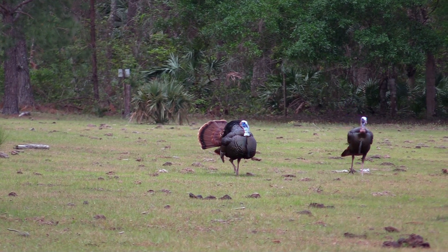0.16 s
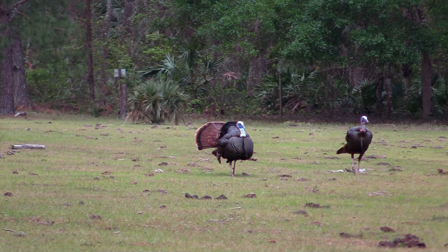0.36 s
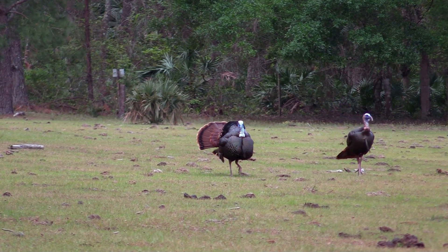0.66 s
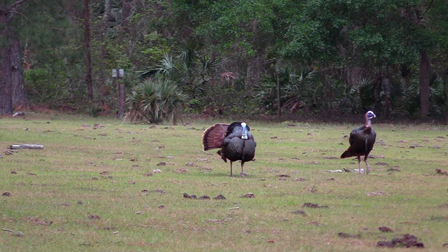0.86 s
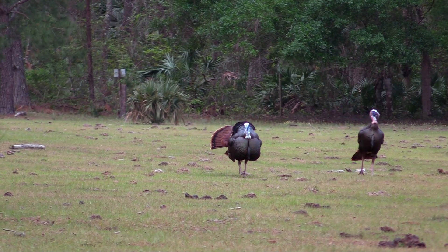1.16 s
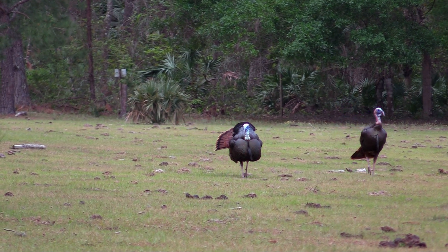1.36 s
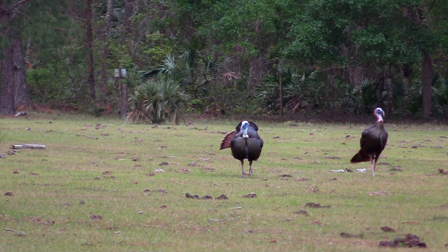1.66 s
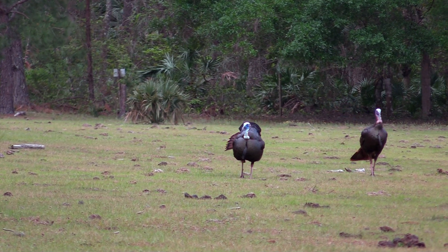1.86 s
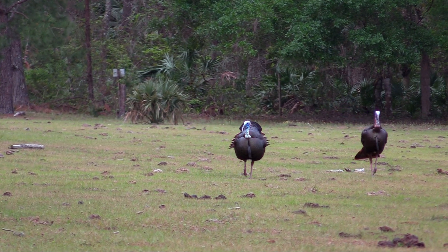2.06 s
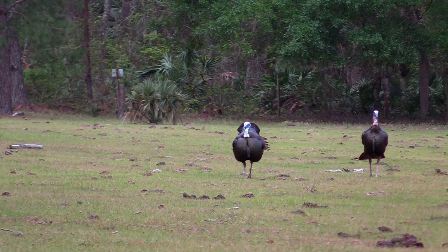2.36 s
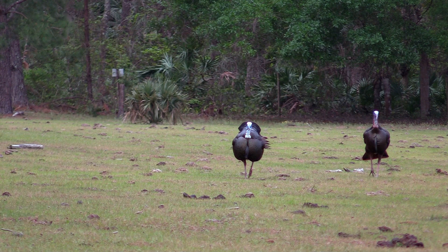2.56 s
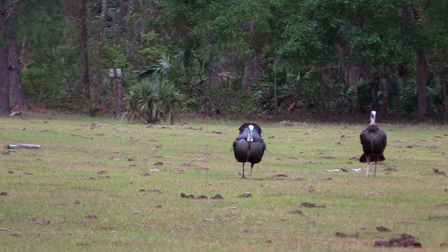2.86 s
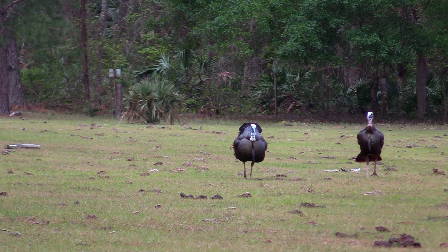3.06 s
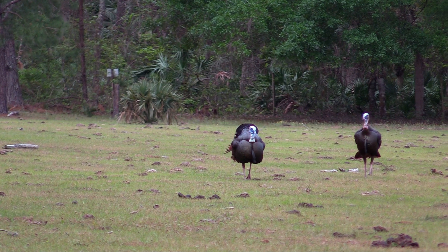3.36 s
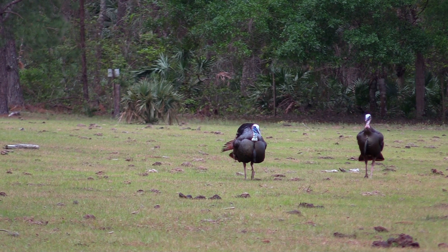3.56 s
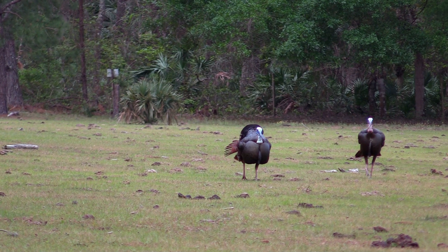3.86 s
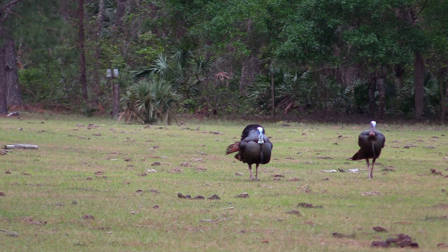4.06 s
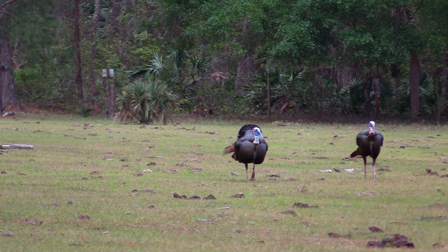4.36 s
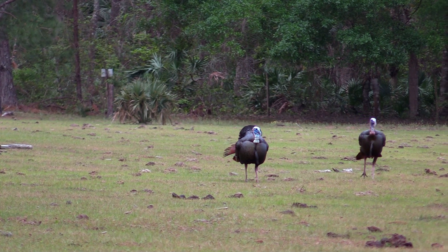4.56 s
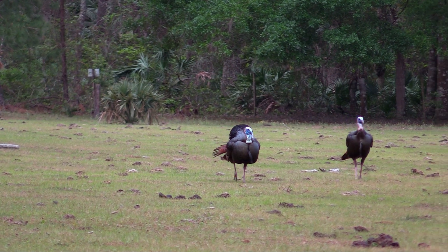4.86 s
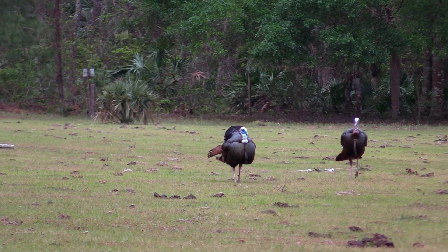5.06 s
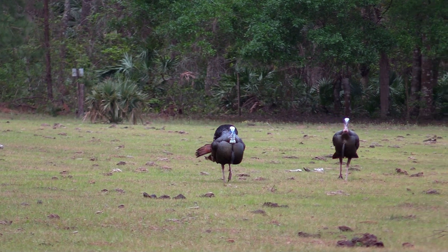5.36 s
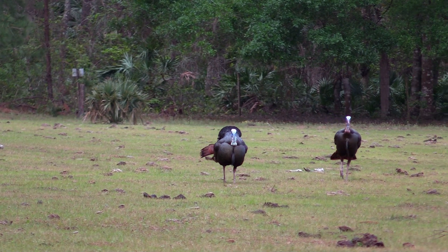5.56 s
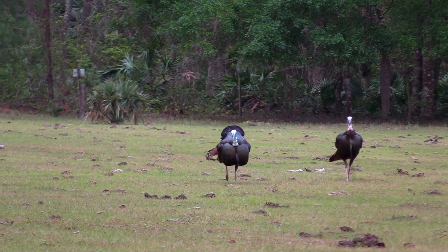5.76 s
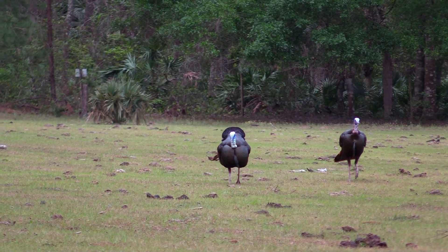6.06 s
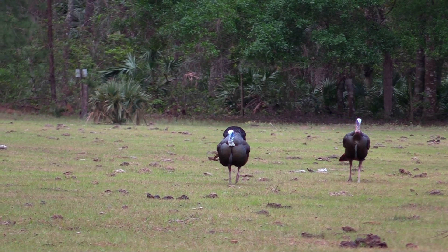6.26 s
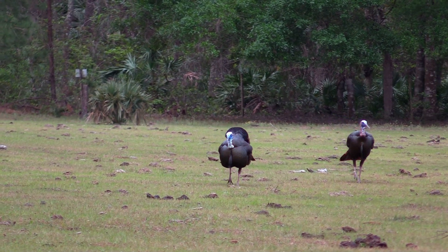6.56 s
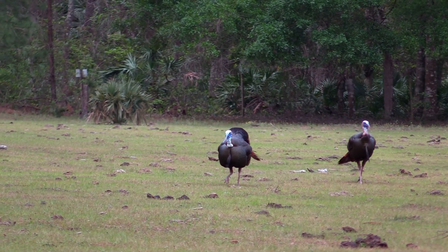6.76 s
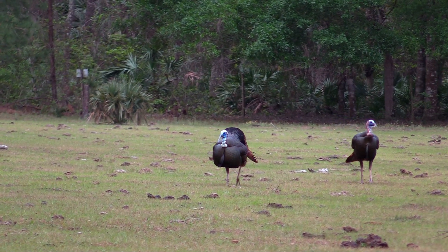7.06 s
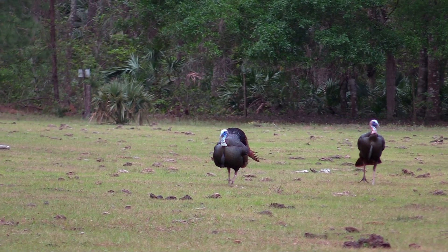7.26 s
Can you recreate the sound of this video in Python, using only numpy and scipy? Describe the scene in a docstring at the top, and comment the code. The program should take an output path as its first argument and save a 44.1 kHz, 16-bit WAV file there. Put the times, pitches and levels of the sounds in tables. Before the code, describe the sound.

A wild turkey lets out one loud, rapid seven-note gobble across an open field, with soft air, low rumble and faint distant birds.

```python
"""A wild turkey gobbles once in a field at the edge of a wood: seven short, loud yelps.
Each is a sum of harmonics that sags, flicks up again and is broken up by resonant slaps.
Behind it are close ticks, faint far calls from the wood, insects and hums made of narrow noise bands,
and rustling air and a low distant rumble made of filtered noise, heard on two microphones.
The recorder's gain control ducks under the gobble and slowly lets the background swell back."""
import sys
import numpy as np
from scipy import signal
from scipy.fft import rfft, irfft, next_fast_len
from scipy.io import wavfile
from scipy.ndimage import uniform_filter1d, minimum_filter1d

SR = 44100
rng = np.random.default_rng(int(sys.argv[2]) if len(sys.argv) > 2 else 0)


def int16_out(signal):
    """Quantize to a 16-bit WAV file."""
    q = np.round(np.clip(np.atleast_2d(signal).T, -1, 1) * 32767)
    wavfile.write(sys.argv[1], SR, q.astype(np.int16))


N = 326781
TIME = np.arange(N) / SR
FREQS = np.maximum(np.arange(N // 2 + 1) * SR / N, 1)


def from_db(db):
    """Decibels to amplitude gain."""
    return 10 ** (np.asarray(db) / 20)


def rms_one(x):
    """Scale to unit rms."""
    return x / np.sqrt(np.mean(x ** 2) + 1e-20)


def at_hz(points, hz, axis=1):
    """Read one column of a spectrum, interpolated on a log-frequency axis."""
    points = np.array(points)
    return np.interp(np.log(hz), np.log(points[:, 0]), points[:, axis])


def colour(x, gain):
    """Filter by a gain per frequency."""
    return irfft(rfft(x) * gain, N)


def ring(x, spectrum):
    """Causal (minimum-phase) body with this spectrum: it rings only after it is struck."""
    size = 2048
    hz = np.maximum(np.arange(size // 2 + 1) * SR / size, 1)
    log_gain = np.log(from_db(at_hz(spectrum, hz)))
    # doubling the cepstrum's positive times makes the response causal
    cepstrum = irfft(log_gain)[:size // 2]
    cepstrum[1:] *= 2
    response = irfft(np.exp(rfft(cepstrum, size)))
    return signal.fftconvolve(x, response)[:len(x)]


def above(x, edge_hz):
    """High-pass with a moving edge: fade between fixed filters a step apart."""
    step = 100  # Hz
    edges = step * np.arange(3, 13)
    edge_hz = np.clip(edge_hz, edges[0], edges[-1])
    shares = np.maximum(1 - np.abs(edge_hz - edges[:, None]) / step, 0)
    filters = [signal.butter(5, hz, "high", fs=SR, output="sos") for hz in edges]
    passed = [signal.sosfiltfilt(sos, x) for sos in filters]
    return np.sum(shares * passed, axis=0)


def drift(rate_hz, size):
    """Smooth chance with spread 1, cut from at least a second of low-passed noise."""
    length = next_fast_len(max(size, int(SR)))
    hz = np.arange(length // 2 + 1) * SR / length
    spectrum = rfft(rng.standard_normal(length)) / (1 + (hz / rate_hz) ** 4)
    return rms_one(irfft(spectrum, length))[:size]


def evened(x):
    """Hold the level steady over a few slaps."""
    power = uniform_filter1d(x ** 2, size=440)
    return x / np.sqrt(power + 1e-3 * np.mean(x ** 2))


# How alike the field sounds at the two microphones. Each row: frequency in Hz, likeness from 0 to 1.
MICROPHONE_LIKENESS = [(60, 0.87), (180, 1), (550, 0.37), (1650, 0.076), (4970, 0.37), (15000, 0.81)]


def likeness(hz):
    """Similarity of the two channels at a frequency: a wave may reach both microphones much alike."""
    return np.clip(at_hz(MICROPHONE_LIKENESS, hz), 0, .99)


def stereo_noise(spectrum):
    """Noise of this spectrum, partly alike in the two channels; rms 1."""
    alike = likeness(FREQS)
    shape = from_db(at_hz(spectrum, FREQS))
    mid = colour(rng.standard_normal(N), shape * np.sqrt(1 + alike))
    side = colour(rng.standard_normal(N), shape * np.sqrt(1 - alike))
    return rms_one(np.array([mid + side, mid - side]))


def narrow_noise(turn, width_hz, size):
    """Random slow swings of a cosine and a sine smear a tone into a narrow band."""
    in_phase = drift(width_hz / 2, size) * np.cos(turn)
    return in_phase + drift(width_hz / 2, size) * np.sin(turn)


def blurred_tone(hz, width_hz, size):
    """A tone (steady or gliding) smeared into a narrow band, partly alike in the two channels; rms 1."""
    turn = 2 * np.pi * np.cumsum(hz * np.ones(size)) / SR
    mid = narrow_noise(turn, width_hz, size)
    side = narrow_noise(turn, width_hz, size)
    alike = likeness(np.mean(hz))
    return rms_one(np.sqrt(1 + alike) * mid + np.sqrt(1 - alike) * side * [[1], [-1]])


SAG_S, FLICK_CURVE = .013, 2.5  # the pitch drops quickly, and rises ever faster at the end
HOLD_SHARE, FADE_CURVE = 0.47, 2.75  # the level holds up to this share of a yelp, then falls ever faster
FLANK_RASP, CLEARING_CURVE = 0.77, 4.9  # rough while it swells and fades, clear at the very end
BREAK_S = 0.0073  # a clean tone breaks up this fast
OPENING_RASP, OPENING_S = 0.48, 0.0077  # every yelp opens with a scrape that dies away


def gesture(t, length, first_hz, lowest_hz, last_hz, flick_s, peak_db,
            swell_s, swell_db, fade_db, rasp, clean_s):
    """Pitch, level and rasp of a yelp: it swells as the pitch sags and fades as the pitch flicks up."""
    flick = np.clip(1 - (length - t) / flick_s, 0, 1) ** FLICK_CURVE
    sag = np.exp(-t / SAG_S)
    pitch = lowest_hz + (first_hz - lowest_hz) * sag + (last_hz - lowest_hz) * flick

    unopened = .5 + .5 * np.cos(np.pi * np.minimum(t / swell_s, 1))
    closing = np.clip((t / length - HOLD_SHARE) / (1 - HOLD_SHARE), 0, 1)
    level_db = peak_db - swell_db * unopened - fade_db * closing ** FADE_CURVE

    rough = rasp + (FLANK_RASP - rasp) * np.maximum(unopened, closing)
    rough = rough * (1 - closing ** CLEARING_CURVE)
    broken = np.clip(1 + (t - clean_s) / BREAK_S, 0, 1)
    scrape = OPENING_RASP * np.exp(-t / OPENING_S)
    return pitch, level_db, np.clip(np.maximum(rough * broken, scrape), .03, .97)


# What the throat passes of the tone's harmonics. Each row: frequency in Hz, relative level in dB.
THROAT_RESPONSE = [(550, 1), (680, -8), (900, -11.5), (1230, 3.5), (1450, -4), (1720, -4.5), (1930, -11),
                   (2200, -17.5), (2600, -23.5), (3100, -32), (4200, -41)]
DULLING_DB = 5.5  # by a yelp's end each harmonic has lost this much more than the one below it


def throat_tone(t, length, pitch, cycles):
    """The syrinx's first six harmonics, weighted by the throat and duller as the yelp closes."""
    dulling_db = DULLING_DB * np.minimum(t / length, 1) ** CLEARING_CURVE
    tone = 0
    for k in range(1, 7):
        harmonic_db = at_hz(THROAT_RESPONSE, k * pitch) - dulling_db * (k - 5)
        tone = tone + from_db(harmonic_db) * np.sin(2 * np.pi * k * cycles)
    return evened(tone)


# The ring of one slap of the syrinx. Each row: frequency in Hz, relative level in dB.
SLAP_RING = [(250, -24.5), (450, -5.5), (750, -1), (1250, 6.5), (1600, -3.5), (1950, 8), (2180, -2.5),
             (2400, -11), (3050, -28.5), (3350, -20), (3800, -37), (4650, -24.5), (5100, -24), (9000, -71)]


def syrinx_slaps(cycles, pitch, slap_cycles, rattle_db=-28, slap_db=1.5, below_pitch_hz=115):
    """Equal impulses as the syrinx slaps shut, with a fine rattle between them, ring the body."""
    size = len(cycles)
    at = np.searchsorted(cycles, slap_cycles)
    clicks = from_db(rattle_db) * rng.standard_normal(size)
    clicks[at[at < size]] -= 1
    # a tighter syrinx rings higher: little sounds far below the pitch
    ringing = above(ring(clicks, SLAP_RING), pitch - below_pitch_hz)
    return from_db(slap_db) * evened(ringing)


# High resonances that rasp and effort wake. Each row: frequency in Hz, nominal width in Hz,
# level in dB before the rasp and effort scale it.
EDGE_RESONANCES = [(2610, 460, -18.5), (3343, 340, -21.5), (5160, 560, -20.5)]


def bright_edge(level_db, rasp, brightening=0.34, full_effort_db=14):
    """Narrow noise bands that strengthen in loud, rough stretches."""
    edge = 0
    for hz, width_hz, db in EDGE_RESONANCES:
        edge = edge + from_db(db) * blurred_tone(hz, width_hz, len(rasp))[0]
    return edge * np.sqrt(rasp) * from_db(brightening * (level_db - full_effort_db))


def yelp(start, length, shape, jitter=0.034, cycles_per_slap=3.8, slap_scatter=.17,
         pulsing=0.49, throb=0.38, throb_hz=190, fade_s=0.0011):
    """The syrinx sings a sagging tone and slaps shut about every four cycles: indices, sound, rasp."""
    size = int((length + .02) * SR)
    t = np.arange(size) / SR
    pitch, level_db, rasp = gesture(t, length, *shape)
    shaken_hz = pitch * (1 + jitter * np.sqrt(rasp) * drift(300, size))
    cycles = np.cumsum(shaken_hz) / SR
    tone = throat_tone(t, length, pitch, cycles)

    # slaps come at uneven gaps
    gaps = cycles_per_slap * np.exp(slap_scatter * rng.standard_normal(80))
    slap_cycles = np.cumsum(gaps) - gaps[0] + .5
    slaps = syrinx_slaps(cycles, pitch, slap_cycles)

    # rough tone swells with each slap and throbs by chance: side bands between its harmonics
    swell = np.cos(2 * np.pi * np.interp(cycles, slap_cycles, np.arange(len(gaps))))
    tone = tone * (1 + rasp * (pulsing * swell + throb * drift(throb_hz, size)))
    voice = evened(np.sqrt(1 - rasp ** 2) * tone + rasp * slaps)
    voice = voice + bright_edge(level_db, rasp)
    gate = np.minimum(t / 0.00078, 1) * np.exp(-np.maximum(t - length, 0) / fade_s)
    return int(start * SR) + np.arange(size), voice * from_db(level_db) * gate, rasp


# The yelps, before the recorder's gain control. Each row: start in seconds, length in seconds,
# first, lowest and last pitch in Hz, closing flick in seconds, peak level in dB, swell in seconds,
# swell in dB, fade in dB, rasp from 0 to 1 in mid-yelp, time until the tone has broken up in seconds.
YELP_GESTURES = [(1.258, 0.1, 695, 642, 803, 0.0422, -9, .02, 2, 11.5, 0.25, 0.038),
                 (1.566, 0.11, 762, 588.7, 855, 0.036, 3.3, 0.085, 12.5, 17.5, 0.27, 0.0052),
                 (1.8717, 0.12, 948.5, 620, 982, 0.071, 3, 0.058, 10, 32.5, 0.35, 0),
                 (2.1948, 0.12, 858, 621.7, 1157, 0.0333, 7, 0.046, 18.5, 31, 0.25, 0.00092),
                 (2.512, 0.1, 991, 676, 1085, .064, -2, 0.036, 5.5, 20, 0.47, 0.016),
                 (2.8187, 0.096, 949, 716.6, 1188, 0.044, -5, .03, 2, 5, 0.67, 0),
                 (3.128, 0.076, 1044, 880.4, 1070, 0.04, -7.5, 0.008, 10, 3.5, 0.87, 0.0021)]
# Weak echoes from the ground and the trees. Each row: delay in seconds, level in dB.
FIELD_ECHOES = [(.014, -21.5), (.045, -37), (.11, -48)]
# The bird at the two microphones. Each row: frequency in Hz, left over right in dB,
# phase lead of the left in radians.
BIRD_AT_MICROPHONES = [(198, -5, -1.5), (613, 0, 1.72), (800, 5, 1.1), (1100, 6.5, 1.46), (1320, 16.5, 0.6),
                       (1610, 11.5, 0), (2020, 11, 0.5), (2730, 8, 1.14), (3400, 8.5, 1.44),
                       (5140, 4.5, 3.5)]
# Hiss that rides on the yelps. Each row: frequency in Hz, relative level in dB.
YELP_HISS = [(2500, -4), (5500, -1.5), (6800, 5.5), (8200, 1), (10400, 3.5), (11200, -12.5), (14000, -13),
             (15000, -28)]


def turkey(hiss_db=-30.5):
    """Yelps with weak echoes and hiss on their rough peaks; the voice mostly leads on the left."""
    voice, hiss_level = np.zeros((2, N))
    for start, length, *shape in YELP_GESTURES:
        span, sound, rasp = yelp(start, length, shape)
        voice[span] += sound
        hiss_level[span] += from_db(hiss_db) * np.abs(sound) * np.sqrt(rasp)

    left = voice.copy()
    for delay, db in FIELD_ECHOES:
        left += from_db(db) * np.interp(TIME - delay, TIME, voice)
    right_gain = from_db(-at_hz(BIRD_AT_MICROPHONES, FREQS))
    right_lag = np.exp(-1j * at_hz(BIRD_AT_MICROPHONES, FREQS, axis=2))
    right = colour(left, right_gain * right_lag)
    return np.array([left, right]) + hiss_level * stereo_noise(YELP_HISS)


# Small dry ticks close by. Each row: start in seconds, peak level in dB, lowest Hz, highest Hz.
CLOSE_TICKS = [(1.0305, -17, 700, 1590), (6.8577, -29, 5500, 8000), (6.91, -32, 7500, 10500),
               (6.9302, -37, 9000, 13000)]


def ticks():
    """Each tick is a single impulse filtered into its own band, equal at both microphones."""
    out = np.zeros(N)
    for s, db, low_hz, high_hz in CLOSE_TICKS:
        band = signal.butter(1, np.sort([low_hz, high_hz]), "band", fs=SR, output="sos")
        snap = signal.sosfilt(band, signal.unit_impulse(256))
        first = int(s * SR)
        out[first:first + len(snap)] += from_db(db) * snap / snap.max()
    return out


def far_call(start, length, db, hz, width_hz, fall_hz=0):
    """A distant call: a blurred tone that rises quickly, may glide down, and dies away."""
    out, first = np.zeros((2, N)), int(start * SR)
    size = min(int(length * SR), N - first)
    progress = np.linspace(0, 1, size)
    envelope = from_db(db) * np.sin(np.pi * np.sqrt(progress))
    out[:, first:first + size] = envelope * blurred_tone(hz - fall_hz * progress, width_hz, size)
    return out


# Far calls from the wood, with levels before the envelope and the lean to the right.
# A far bird's falling whistle. Each row: start in seconds, length in seconds, level in dB.
FALLING_WHISTLES = [(0.816, .35, -50), (1.284, .28, -50), (5.784, .26, -54), (6.226, 0.42, -50),
                    (6.686, 0.33, -48)]
# A lower, level reply. Each row: start in seconds, length in seconds, level in dB.
LEVEL_REPLIES = [(1.05, 0.21, -50), (6.02, 0.15, -52), (6.45, .27, -48)]
# Thin high chirps. Each row: start in seconds, length in seconds, starting pitch in Hz, level in dB.
HIGH_CHIRPS = [(5.45, 0.05, 6950, -50.5), (5.688, 0.047, 7070, -52.5), (5.89, 0.34, 7200, -53.5),
               (6.124, 0.28, 7400, -55.5)]
# Far hoots on one note. Each row: start in seconds, length in seconds, level in dB.
FAR_HOOTS = [(3.847, 1, -49), (4.582, 0.43, -48.5), (5.783, 0.26, -44), (6.007, 0.2, -43),
             (6.152, 0.44, -45), (6.589, .17, -50)]
CHIRP_FALL_HZ_PER_S, CHIRP_SPREAD_HZ_PER_S = 900, 1900  # a longer chirp falls further and is wider


def far_calls(right_db=3.5):
    """Four kinds of blurred call from the wood, a little to the right."""
    whistles = sum(far_call(*row, hz=3416, width_hz=116, fall_hz=170.3) for row in FALLING_WHISTLES)
    replies = sum(far_call(*row, hz=2570, width_hz=110) for row in LEVEL_REPLIES)
    hoots = sum(far_call(*row, hz=761, width_hz=12) for row in FAR_HOOTS)
    chirps = np.zeros((2, N))
    for s, length, hz, db in HIGH_CHIRPS:
        width_hz, fall_hz = CHIRP_SPREAD_HZ_PER_S * length, CHIRP_FALL_HZ_PER_S * length
        chirps += far_call(s, length, db, hz, width_hz, fall_hz)
    return (whistles + replies + chirps + hoots) * from_db([[-right_db], [0]])


# Steady far sounds: a low hum, a faint whine and two bands of insects.
# Each row: frequency in Hz, nominal width in Hz, mean level in dB.
FAR_DRONES = [(109.5, 18, -48.5), (199.2, 14.3, -49.5), (764, 30, -51), (5040, 440, -60.5),
              (5760, 1170, -57)]


def drones(lumpy_db):
    """Hum, whine and insects as narrow noise bands whose levels wander slightly."""
    out = np.zeros((2, N))
    for hz, width_hz, db in FAR_DRONES:
        out += from_db(db + lumpy_db * drift(6, N)) * blurred_tone(hz, width_hz, N)
    return out


# A low hum that comes up near the end. Each row: time in seconds, level in dB.
HUM_LEVEL = [(6.25, -59), (6.5, -39.5), (6.95, -42), (7.41, -52)]


def late_hum():
    """A narrow low band follows a level drawn over time."""
    level_db = np.interp(TIME, *np.transpose(HUM_LEVEL))
    return from_db(level_db) * blurred_tone(110.8, 5.4, N)


# Rustling air over the field. Each row: frequency in Hz, relative level in dB per Hz.
AIR_SPECTRUM = [(60, -34), (250, -2), (600, 1), (1050, -0.5), (1300, -2), (2300, -7), (3000, -11.5),
                (4300, -17), (6500, -19.5), (10000, -25), (13000, -30), (15500, -40)]


def rustling_air(air_db=-39.0):
    """Steady broad noise, partly alike at the microphones."""
    return from_db(air_db) * stereo_noise(AIR_SPECTRUM)


# Distant rumble. Each row: frequency in Hz, relative level in dB per Hz.
RUMBLE_SPECTRUM = [(20, -22), (35, -19), (50, -6.5), (80, 0.5), (115, -0.5), (145, 1.5), (172, -7.5),
                   (198, -3), (250, -12), (400, -18), (900, -49)]
GUST_S, GUST_LENGTH_S, GUST_DB = 4.83, 0.061, 9  # centre, spread and lift of one soft gust


def distant_rumble(lumpy_db, rumble_db=-37.5):
    """Low noise wanders slightly in level and is lifted once by a gust."""
    gust = np.exp(-((TIME - GUST_S) / GUST_LENGTH_S) ** 2)
    level_db = rumble_db + GUST_DB * gust + lumpy_db * drift(8.1, N)
    return from_db(level_db) * stereo_noise(RUMBLE_SPECTRUM)


# the background dips briefly, deepest just after the last yelp
DIP_S, DIP_FALL_S, DIP_RECOVERY_S, DIP_DB = 3.29, 0.11, 0.32, 8


def scene(lumpy_db=0.4):
    """The turkey over the field's background."""
    background = ticks() + far_calls() + drones(lumpy_db) + late_hum()
    background = background + rustling_air() + distant_rumble(lumpy_db)
    dip = np.interp(TIME, [DIP_S - DIP_FALL_S, DIP_S, DIP_S + DIP_RECOVERY_S], [0, 1, 0])
    return turkey() + from_db(-DIP_DB * dip) * background


# SQUEEZE_SHARE is the share of any level over the threshold that is taken away
THRESHOLD_DB, SQUEEZE_SHARE, ATTACK_S, RELEASE_DB_PER_S = -11.5, 0.64, 0.0093, 3.5


def gain_control(x):
    """Loud sound turns the gain down quickly; it creeps back at a steady rate."""
    power = uniform_filter1d(np.max(x ** 2, axis=0), size=880)
    level_db = 10 * np.log10(np.maximum(power, 1e-12))
    wanted_db = SQUEEZE_SHARE * np.maximum(level_db - THRESHOLD_DB, 0)
    # the running maximum on a rising ramp lets the reduction fall only at the release rate
    ramp_db = RELEASE_DB_PER_S * TIME
    held_db = np.maximum.accumulate(wanted_db + ramp_db) - ramp_db
    keep = np.exp(-1 / (ATTACK_S * SR))
    return x * from_db(-signal.lfilter([1 - keep], [1, -keep], held_db))


def record(dry, cutoff_hz=15500):
    """Gain control, then a fast limiter that holds the loudest peaks at full scale; the top is cut."""
    ducked = gain_control(dry)
    room_left = 1 / np.maximum(np.abs(ducked).max(axis=0), 1)
    gain = uniform_filter1d(minimum_filter1d(room_left, size=81), size=81)
    low_pass = signal.ellip(10, .1, 80, cutoff_hz, fs=SR, output="sos")
    return signal.sosfilt(low_pass, ducked * gain)


dry = scene()
out = record(dry)
int16_out(out)
```